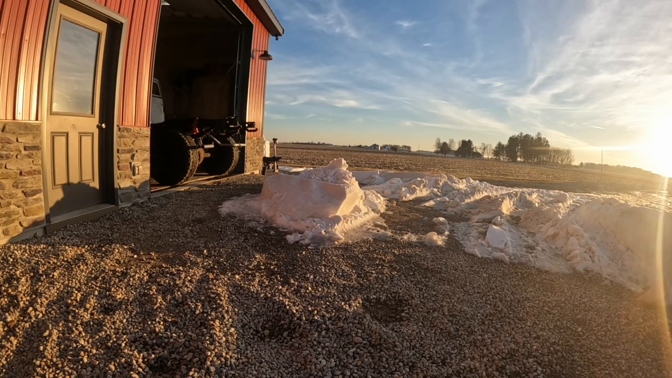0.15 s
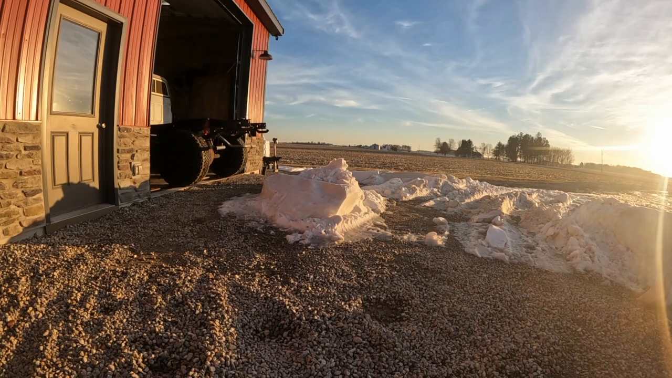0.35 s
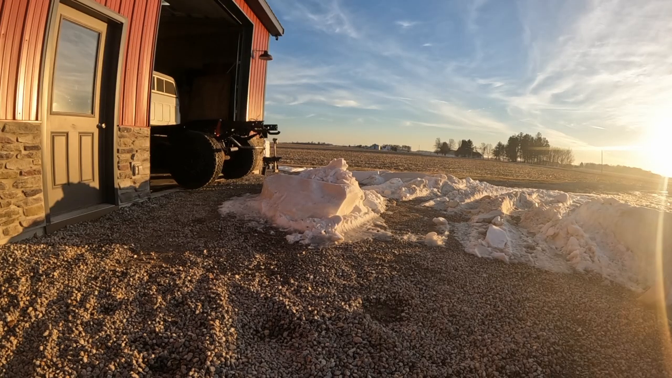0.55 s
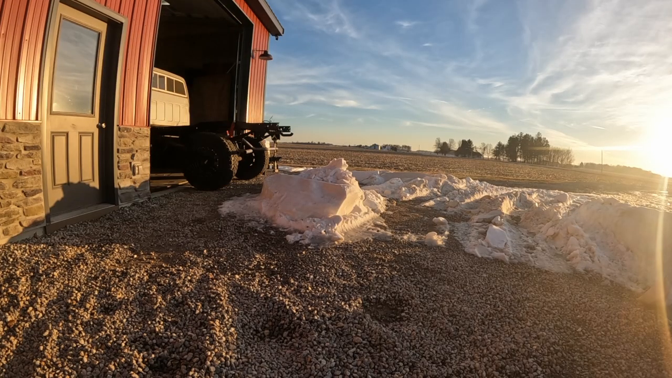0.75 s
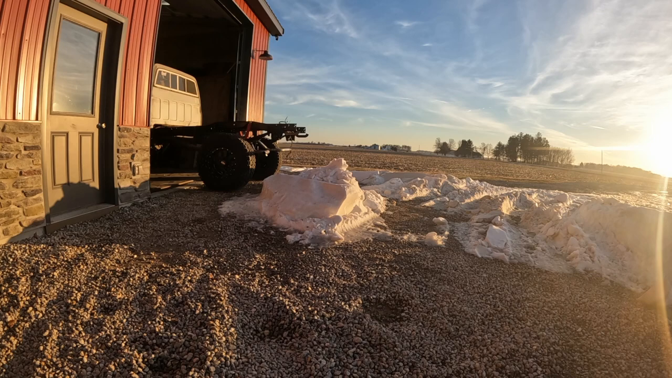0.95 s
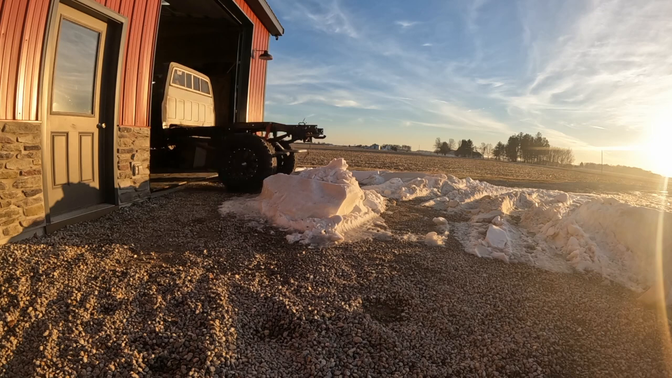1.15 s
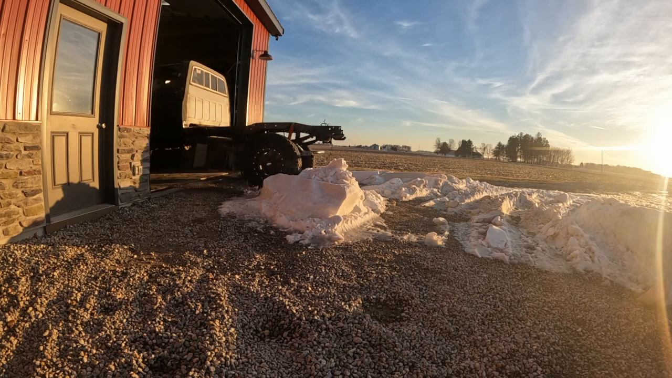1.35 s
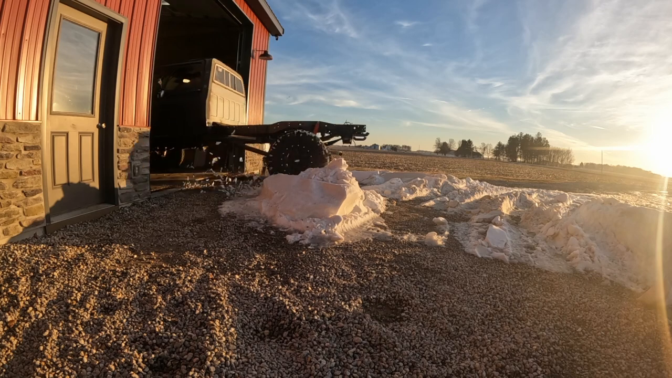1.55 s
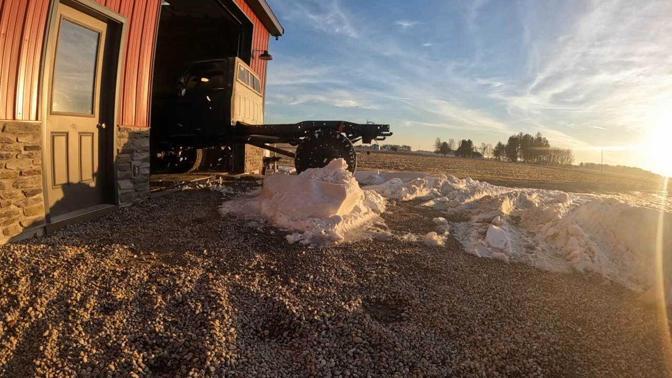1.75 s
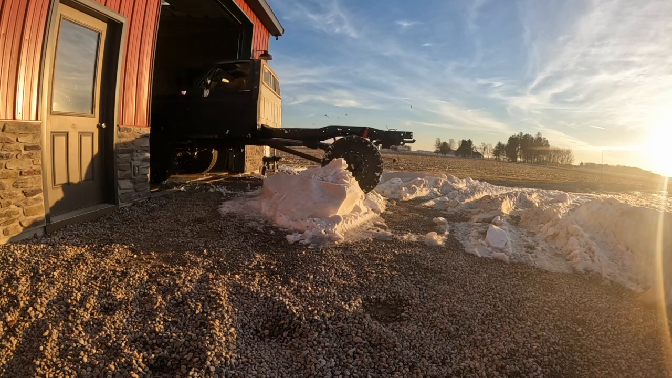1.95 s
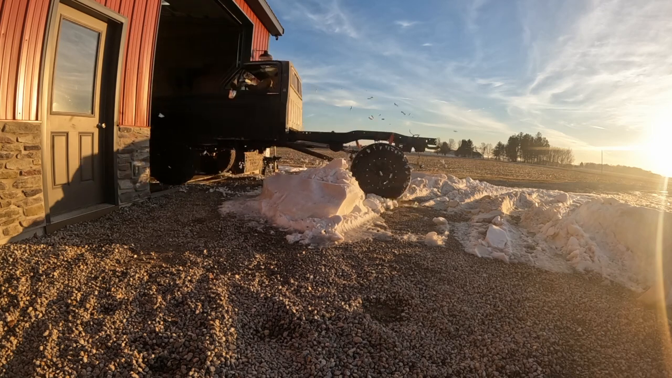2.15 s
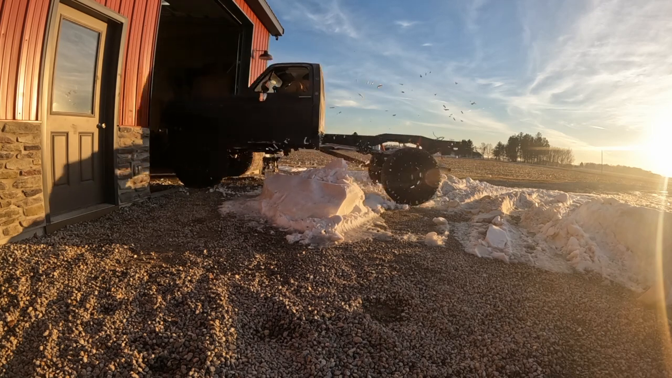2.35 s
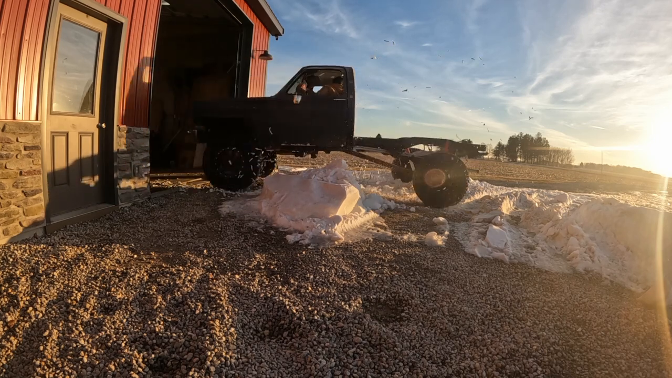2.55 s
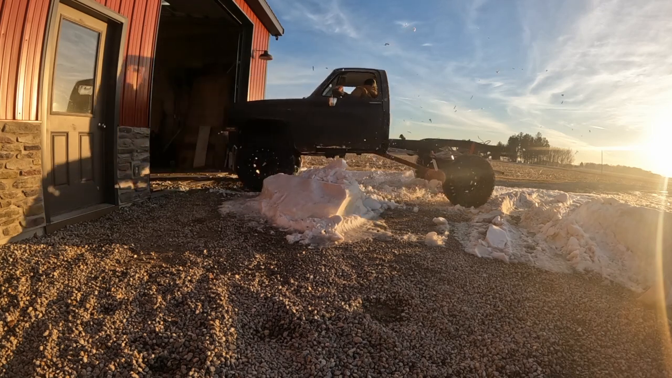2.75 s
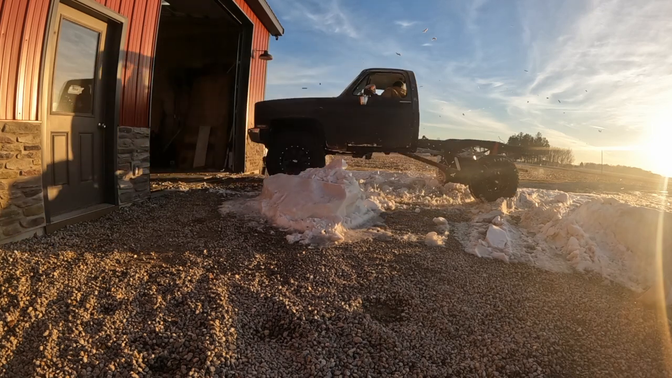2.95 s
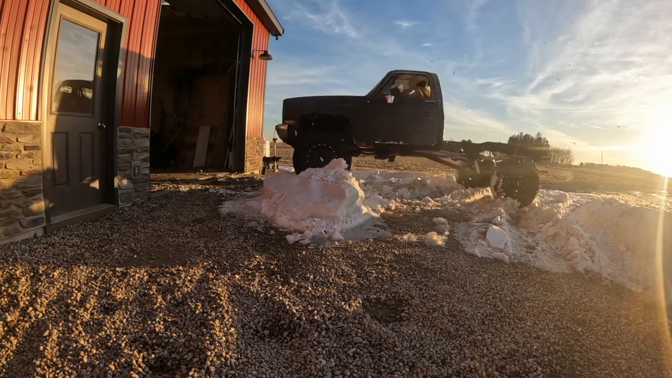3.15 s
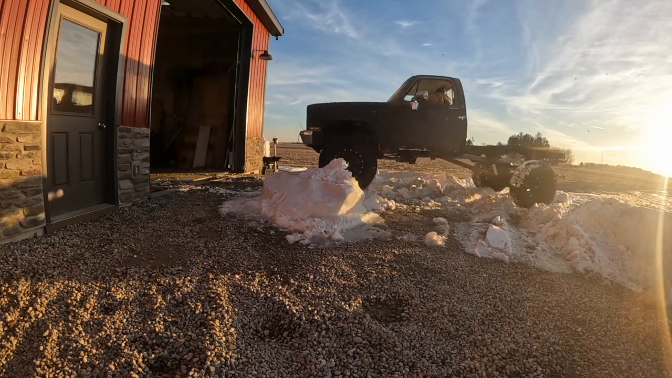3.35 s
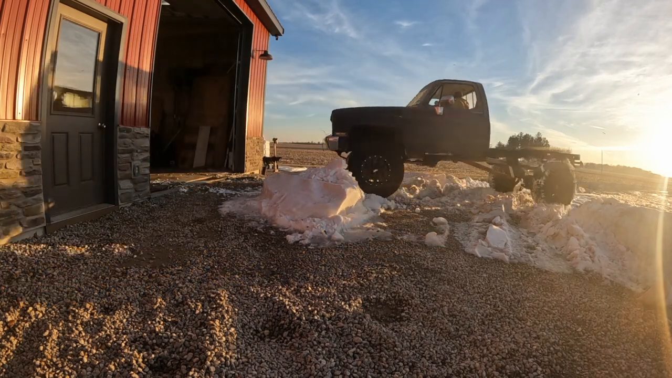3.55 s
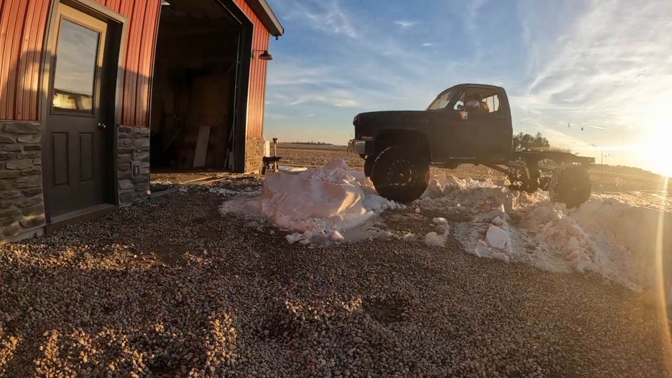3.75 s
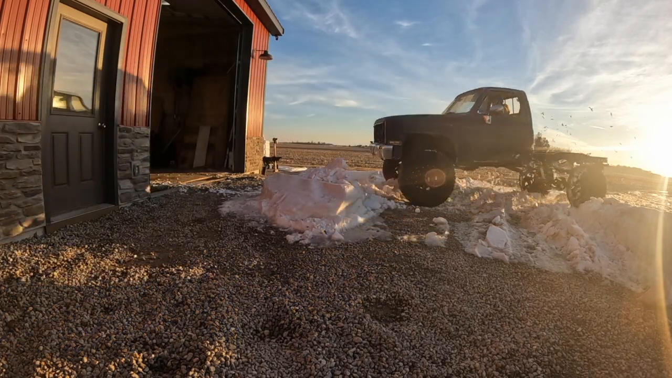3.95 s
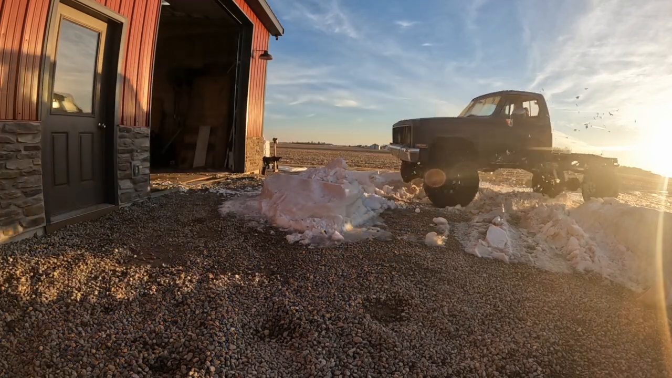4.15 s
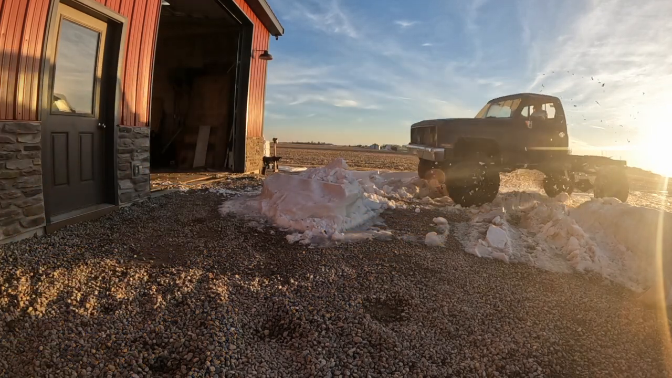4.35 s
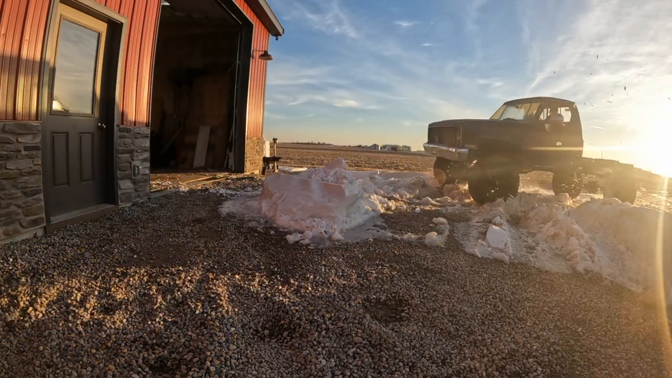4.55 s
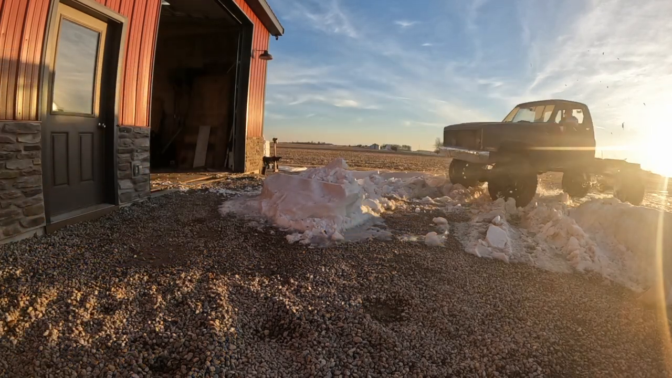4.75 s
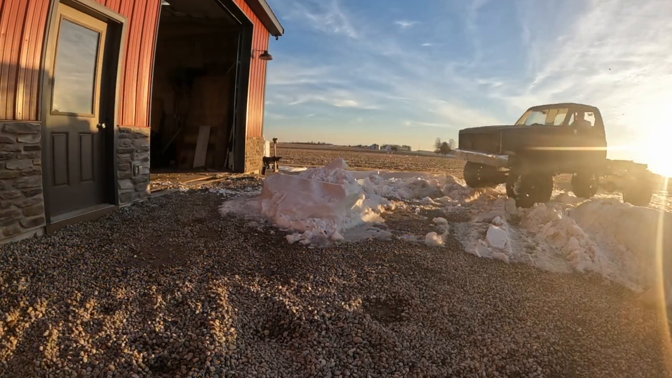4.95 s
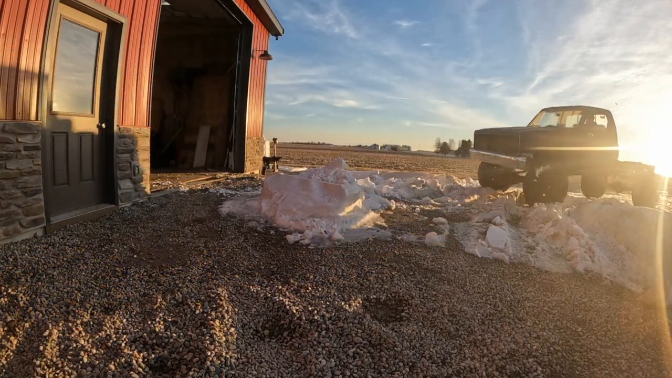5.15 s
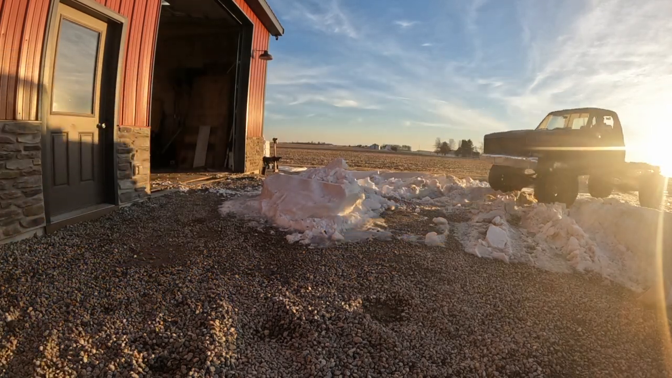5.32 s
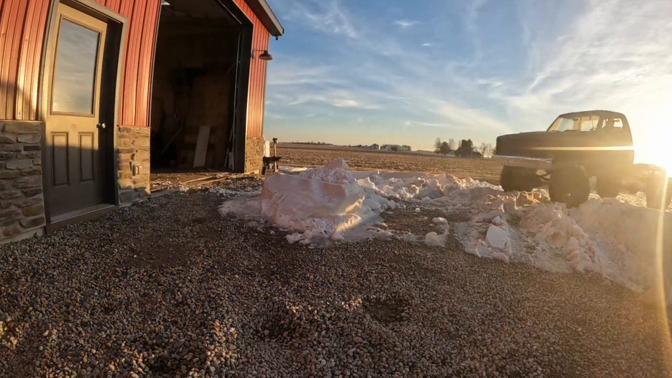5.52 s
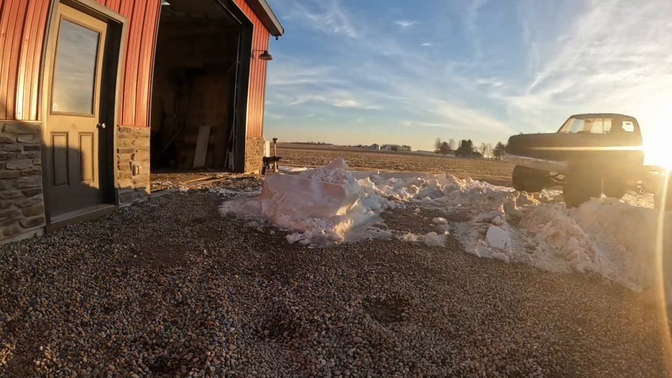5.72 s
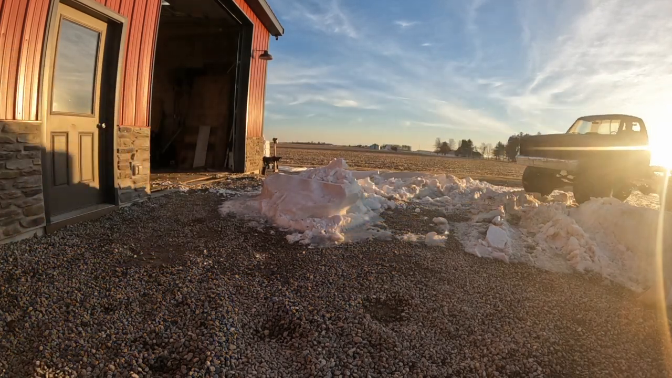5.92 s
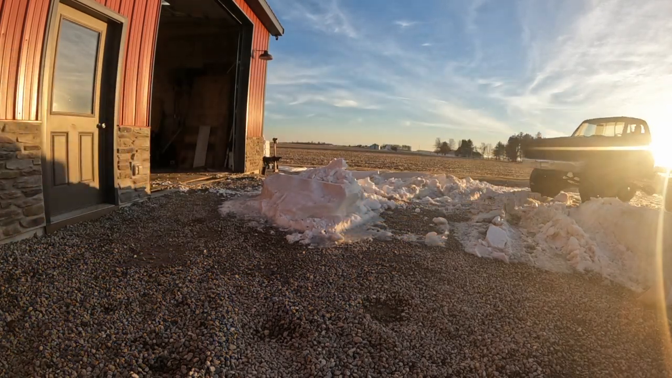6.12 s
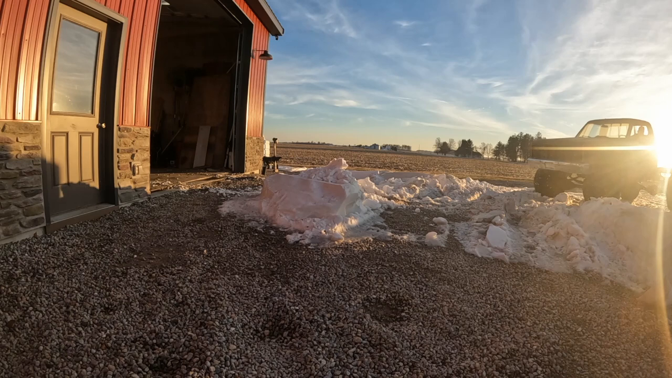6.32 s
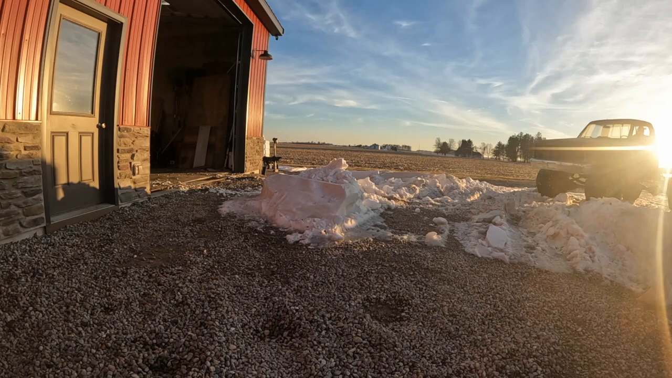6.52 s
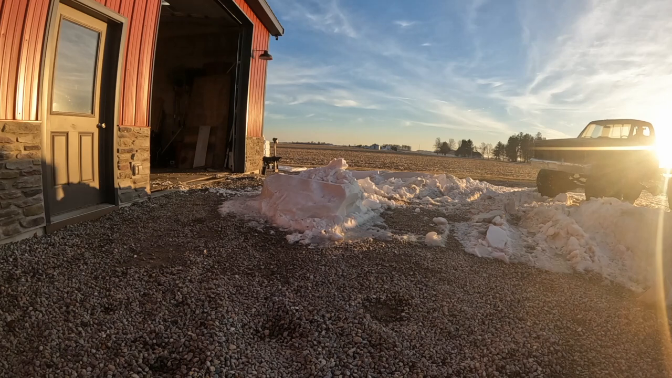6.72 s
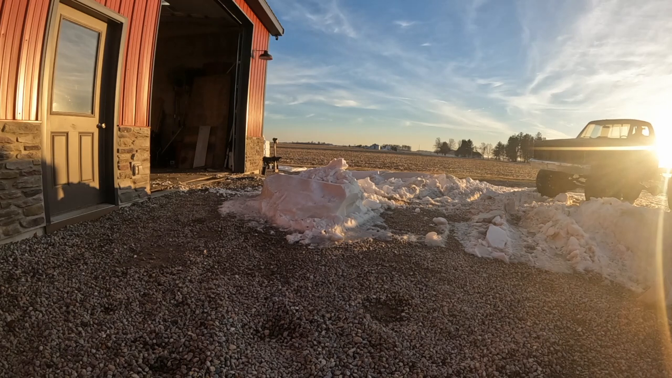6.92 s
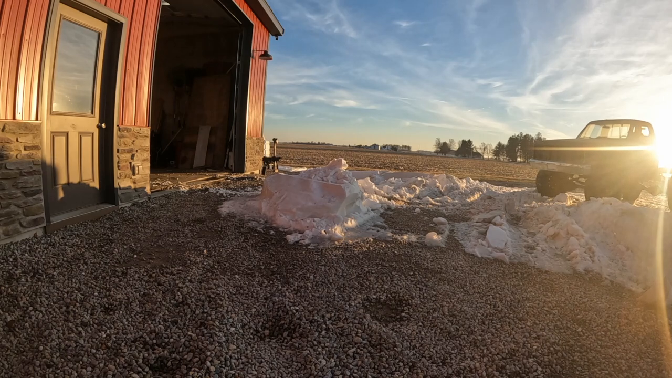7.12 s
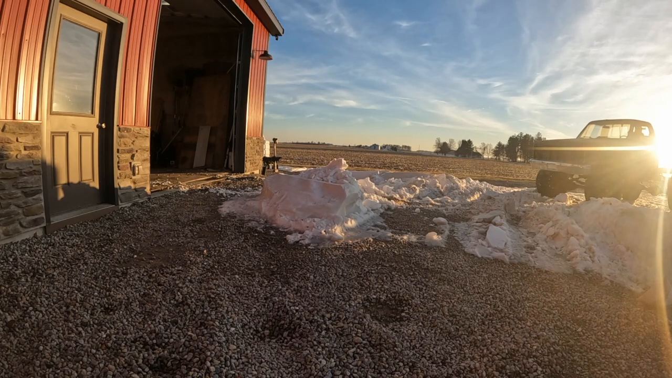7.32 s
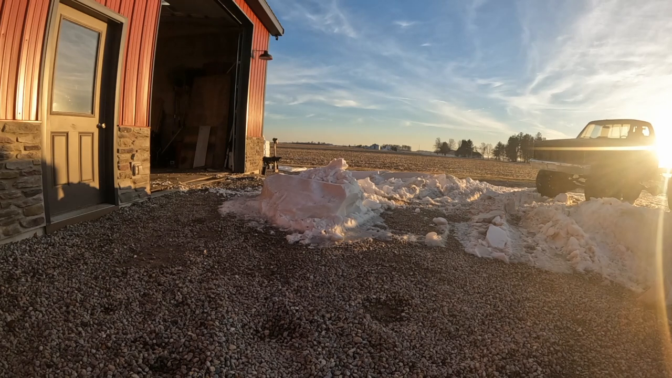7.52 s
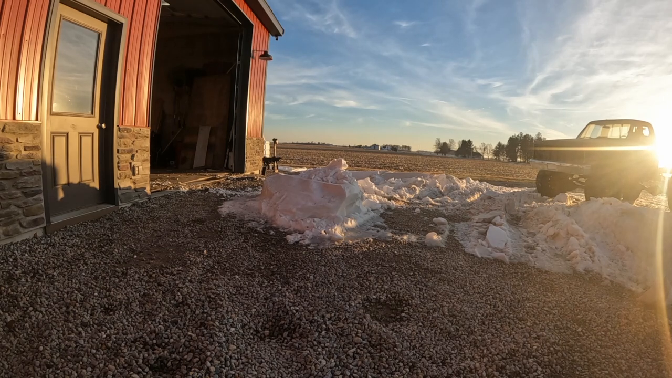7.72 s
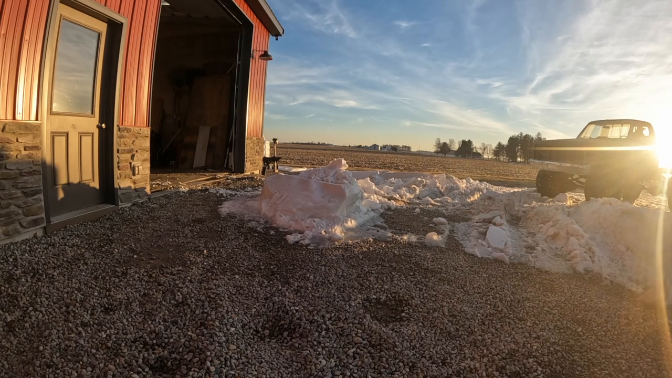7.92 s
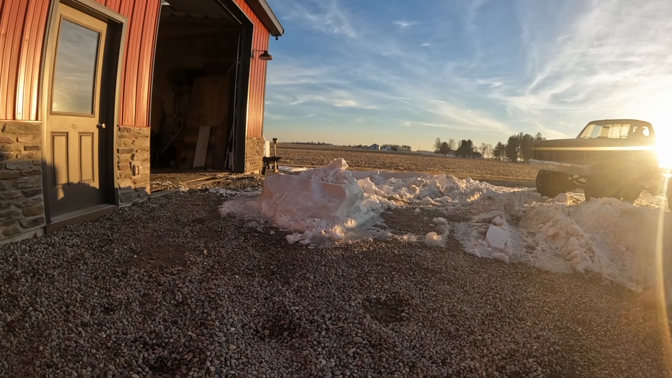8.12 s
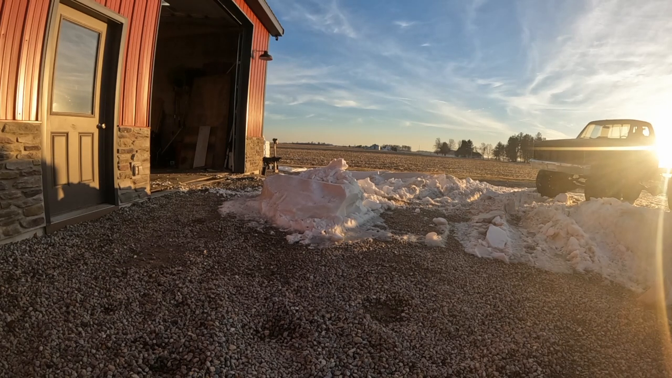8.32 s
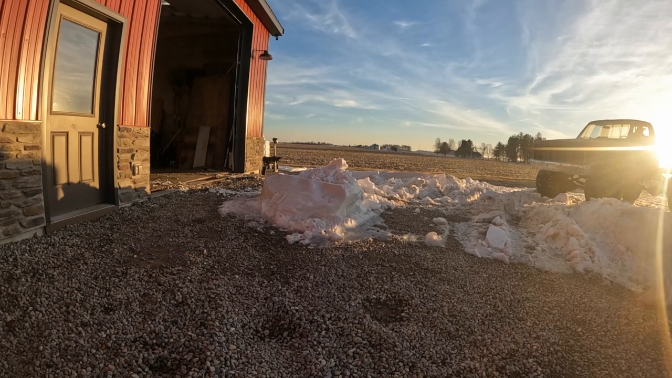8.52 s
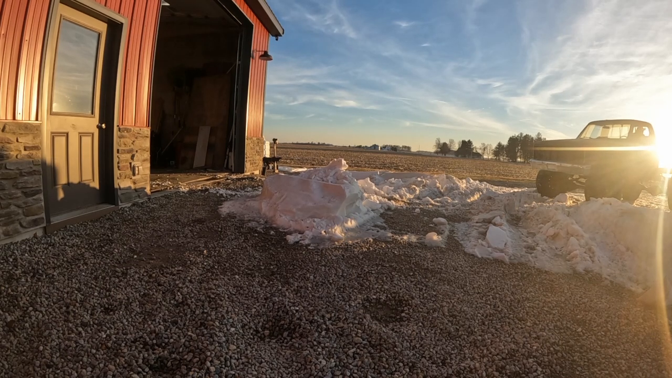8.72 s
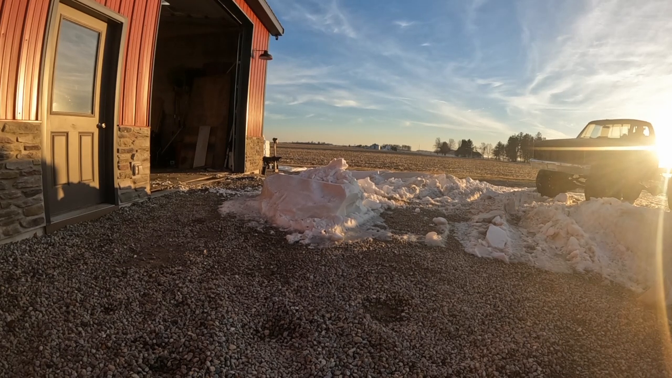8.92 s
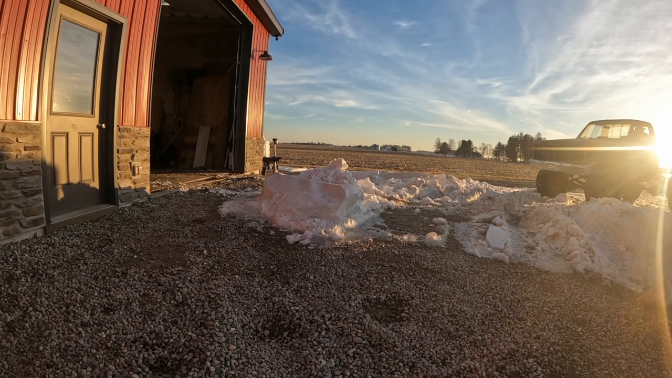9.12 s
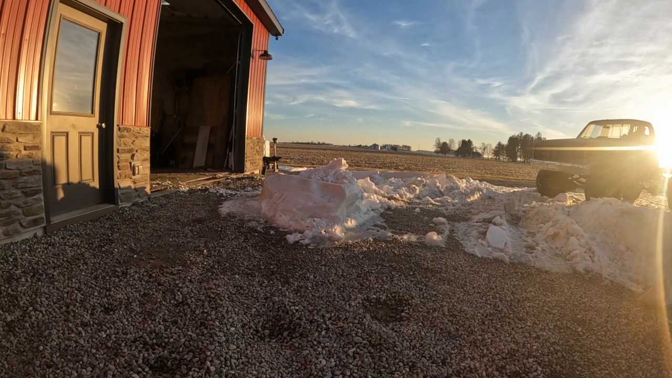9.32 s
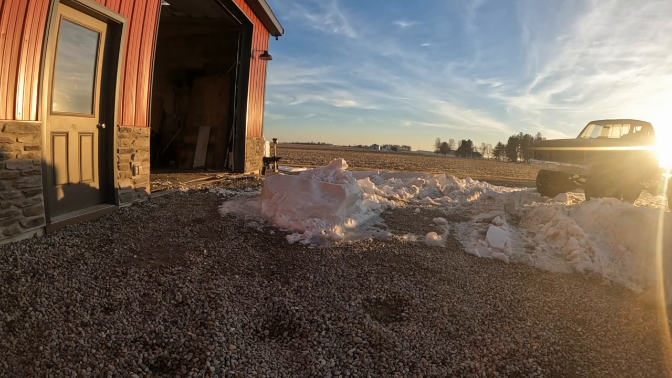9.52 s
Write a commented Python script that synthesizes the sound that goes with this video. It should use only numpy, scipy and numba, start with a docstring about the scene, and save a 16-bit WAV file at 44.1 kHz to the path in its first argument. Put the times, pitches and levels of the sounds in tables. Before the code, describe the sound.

An old V8 truck with short, unmuffled pipes backs out of a shed onto gravel. Ragged barks and deep thumps rise into several throttle surges, with sharp metallic snaps on the hardest firings and brief drops between. After about six seconds it falls to a slow, lumpy idle with soft chuffs and faint mechanical hiss. Short wall echoes follow the cracks; the stereo microphone stands on the ground outside, its loudest peaks slightly rounded.

```python
"""A cross-plane V8 truck with short open pipes backs out of a shed, blips and idles lumpily.
Two banks fire unevenly into their own pipes; every blow-down thumps the pipe and spits a crack of gas.
A few metallic snaps top the hardest firings; fan, intake and valve gear hiss on.
Place: the shed walls echo, and the slap off its front grows later as the truck draws away.
Microphone: two ports, standing on the ground; their preamp rounds the loudest peaks."""
import sys
import numpy as np
from scipy import signal
from scipy.fft import rfft, irfft, next_fast_len
from scipy.io import wavfile
from scipy.ndimage import uniform_filter1d
from numba import njit

SR = 44100
rng = np.random.default_rng(int(sys.argv[2]) if len(sys.argv) > 2 else 0)


def waveform_to_disk(signal):
    """Save audio, clipped to [-1, 1], as 16-bit WAV at the path in sys.argv[1]."""
    frames = np.transpose(np.atleast_2d(signal))
    scaled = np.clip(frames, -1, 1) * 32767
    samples = np.round(scaled).astype(np.int16)
    wavfile.write(sys.argv[1], SR, samples)


N = 426444


def undb(db):
    """Decibels to amplitude gain."""
    return 10 ** (np.asarray(db) / 20)


def unit(x):
    """Scale to rms 1."""
    return x / np.sqrt(np.mean(x ** 2))


def over_time(table):
    """Read a table at every sample: one signal for each column after the time."""
    s, *columns = np.transpose(table)
    return [np.interp(np.arange(N) / SR, s, column) for column in columns]


def on_log_hz(table, size):
    """Read a (f/Hz, value) table at every bin of a transform."""
    hz, value = np.transpose(table)
    return np.interp(np.log(np.fft.rfftfreq(size, 1 / SR) + 1), np.log(hz + 1), value)


def ring(x, modes):
    """Sum of resonances (f/Hz, width/Hz, level/dB) with alternating sign."""
    total = 0
    for k, (hz, width, db) in enumerate(modes):
        resonance = signal.lfilter(*signal.iirpeak(hz, hz / width, fs=SR), x)
        total = total + (-1) ** k * undb(db) * resonance
    return total


def butter(x, order, hz, kind="low"):
    """Butterworth filter, low-pass unless told otherwise."""
    return signal.sosfilt(signal.butter(order, hz, kind, fs=SR, output="sos"), x)


def fade(x, tau_s):
    """Every impulse becomes a sudden rise and an exponential fall."""
    return signal.lfilter([1], [1, -np.exp(-1 / (tau_s * SR))], x)


def impulses(s, size):
    """Impulses of given sizes at given times; those outside the scene are dropped."""
    at = np.round(s * SR).astype(int)
    keep = (at >= 0) & (at < N)
    return np.bincount(at[keep], size[keep], N)


def walk(rate):
    """Random levels, a new one every 1 / rate s, joined by straight slopes; spread near 1."""
    k = int(SR / rate)
    steps = np.repeat(rng.standard_normal(N // k + 1), k)
    return 1.2 * uniform_filter1d(steps, k)[:N]


# engine speed: t/s, four-stroke cycles f/Hz
SPEED = [(0, 7.382), (0.52, 9.008), (0.77, 7.378), (0.88, 11.195), (1.17, 14.199), (1.5, 14.7),
         (1.76, 10.457), (2.52, 16.272), (2.97, 11.643), (3.1, 7.017), (3.3, 10.149), (3.47, 9.393),
         (3.56, 11.84), (3.96, 14.978), (4.55, 13.422), (4.75, 10.731), (5.13, 7.672), (5.41, 9.436),
         (5.68, 10.56), (6.24, 4.747), (6.77, 5.563), (7.26, 4.849), (8.22, 6.06), (8.7, 6.2), (9.0, 6.68),
         (9.67, 6.9)]
START_CYCLE = -.435  # crank position at the first sample, in cycles
PULLING_HZ, IDLING_HZ = 10.3, 3.4  # cycles a second that bound the two states


def crank():
    """Cycles a second, cycles turned so far, and how far the engine is from idling (0) to pulling (1)."""
    cycle_hz, = over_time(SPEED)
    pulling = np.clip((cycle_hz - IDLING_HZ) / (PULLING_HZ - IDLING_HZ), 0, 1)
    return cycle_hz, START_CYCLE + np.cumsum(cycle_hz) / SR, pulling


# cylinders in firing order: bank (0 near, 1 far), thump level/dB,
# crack level/dB over the hiss table (used for the quiet cylinders only)
CYLINDERS = [(0, 0.5, 0), (1, -4, 0), (0, -3.5, -7), (0, -3, 0), (1, -11.5, -5), (0, -7, -7), (1, -3, 2.5),
             (1, -4, -12)]
FAR_BANK_LAG_S = 0.00462


def firings(jitter_s):
    """Times (cycles x cylinders): eighths of each cycle, the far bank arriving later down its longer path."""
    turns = crank()[1]
    due = np.arange(-1, np.ceil(turns[-1]))[:, None] + np.arange(8) / 8
    when = np.interp(due, turns, np.arange(N) / SR, left=-1, right=N)
    when = when + FAR_BANK_LAG_S * np.array(CYLINDERS)[:, 0]
    return when + jitter_s * rng.standard_normal(when.shape)


# pipe resonances of the near bank and the far bank: f/Hz, width/Hz, level/dB
NEAR_PIPE = [(58, 9, 0), (110, 25, -9), (150, 30, -12)]
FAR_PIPE = [(64, 16, -3), (165, 30, -13)]
# slowest surge of the gas: f/Hz, width/Hz, level/dB
SUB_PIPE = [(27.7, 12, -17)]
# upper resonances of both pipes: f/Hz, width/Hz, relative level/dB
UPPER_PIPE = [(152, 20, 1.5), (214, 35.3, 4), (271.4, 35, -3)]
# throat resonances, strongest with the throttle open: f/Hz, width/Hz, relative level/dB
THROAT = [(275.2, 43.4, 8.5), (348, 205, 1), (655, 97, -0.5)]
# how evenly the cylinders burn: t/s, share of the bass power that repeats from cycle to cycle
EVEN = [(0, .4), (.8, .5), (1.05, .92), (2.75, .92), (3.3, .6), (3.75, .92), (4.6, .9), (4.9, .7),
        (5.4, .85), (5.85, .9), (6.1, .5), (7.7, .6), (8.2, .88), (9.67, .9)]


def thump(when, bright_db, scatter_db, rumble_db):
    """Blow-down pulses ring each bank's pipe; the upper resonances wake with the throttle."""
    bank, db, _ = np.transpose(CYLINDERS)
    size = undb(db + scatter_db * rng.standard_normal(when.shape))
    near, far = (-impulses(when[:, bank == b].ravel(), size[:, bank == b].ravel()) for b in (0, 1))
    both = near + far
    churn = undb(rumble_db) * np.std(both) * rng.standard_normal((2, N))  # turbulence in the pipes

    low = ring(near + churn[0], NEAR_PIPE) + ring(far + churn[1], FAR_PIPE)
    low = butter(low, 2, [48, 180], "band") + ring(far + churn[1], SUB_PIPE)
    upper = butter(ring(both + 0.88 * churn[0], UPPER_PIPE), 3, 290)
    s, peak_db, _ = np.transpose(BARKS)
    kick = -impulses(s, undb(peak_db + 8.5))  # each listed bark kicks the throat as well
    throat = ring(both + kick + 1.15 * churn[1], THROAT)

    # each layer is brought to a steady level over a third of a second; the drive table sets its loudness
    low, upper, throat = (v / np.sqrt(uniform_filter1d(v ** 2, SR // 3) + 1e-12)
                          for v in (low, upper, throat))
    even, = over_time(EVEN)
    bass = np.sqrt(1 - even) * low + np.sqrt(even) * drone()
    upper = np.sqrt(1 - 0.36 * even) * undb(0.65 * bright_db - 5.5) * upper
    return bass + upper + undb(2.026 * bright_db - 1.0) * throat


# multiples of the engine cycle, from the second up: level/dB pulling, level/dB idling (relative)
ORDERS_DB = [(-16, -17), (-14, -4), (-12, -15), (0, -8), (-4, -20), (-12, -22), (-8, -3), (-7, 0), (-9, -9),
             (-11, 0), (-10, -6), (-8, -9), (-8, -12), (-12, -9), (-16, -1), (-18, -14), (-17, -16),
             (-17, -15), (-21, -19), (-20, -6), (-20, -7)]
# the pipe lifts or sinks whichever order crosses a low resonance: f/Hz, width/Hz, level/dB
BOOMS = [(57, 60, 8), (108.4, 19.6, 11), (159.6, 61, 8)]
# the slower the gas, the sharper the pipe's own note and the gap above it: f/Hz, width/Hz, level/dB
IDLE_BOOMS = [(57, 10, 13), (79, 14, -11)]
# the lope between the banks: t/s, fifth order level/dB, sixth order level/dB
LOPE = [(0, 1, 5), (1.2, 0, -3), (2.1, -3, -7), (2.5, -2, 3), (2.68, -12, -14), (3.3, -3, 2), (3.5, -9, 2),
        (3.68, 1, 2), (4.55, 0, 0), (4.75, -16, 5), (5.5, -18, 5), (9.67, -2, 0)]


def boost_db(hz, booms):
    """Lift in dB that a set of broad resonances gives a tone of changing frequency."""
    return sum(db / (1 + (2 * (hz - centre) / width) ** 2) for centre, width, db in booms)


def drone():
    """What repeats every cycle: a stack of crank orders whose balance shifts with engine speed."""
    cycle_hz, turns, pulling = crank()
    fifth_db, sixth_db = over_time(LOPE)
    # the strong blow-downs within a cycle set the phases
    place, strength = np.array([0, 1.6, 3, 4.6, 6.4]) / 8, np.array([1, .9, .5, .6, .5])
    out = power = 0
    for order, (pull_db, idle_db) in enumerate(ORDERS_DB, 2):
        hz = order * cycle_hz
        state_db = idle_db + pulling * (pull_db - idle_db)
        boom_db = boost_db(hz, BOOMS) + (1 - pulling ** 2) * boost_db(hz, IDLE_BOOMS)
        lope_db = fifth_db * ((order == 5) - .3 * (order == 8)) + sixth_db * (order == 6)
        size = undb(state_db + boom_db + lope_db)
        start = np.angle(np.sum(strength * np.exp(-2j * np.pi * order * place)))
        out = out + size * undb(1.6 * walk(6.)) * np.sin(2 * np.pi * order * turns + start)
        power = power + size ** 2 / 2
    return out / np.sqrt(power)


# three cylinders that bark between the listed barks while pulling and fall nearly silent at idle:
# place in the firing order, level/dB over the hiss table pulling, level/dB over the hiss table idling
BARKERS = [(0, 4, -27), (1, 4, -30), (3, 1, -29.5)]
BARKER_SCATTER_DB = 4
# barks heard one by one, from hard cracks to soft idle chuffs:
# t/s, relative peak level/dB, treble level/dB against that peak
BARKS = [(0.036, -15, -2.5), (0.081, -11.5, -8.5), (0.102, -9, -22), (0.278, -23.5, -18), (0.306, -7, -18),
         (0.343, -14, -10.5), (0.435, -20.5, -10), (0.462, -11.5, -11.5), (0.517, -14, -15.5),
         (0.533, -4.5, -21), (0.552, -8.5, -14.5), (0.653, -6.5, -12.5), (0.691, -6.5, -17),
         (0.759, -9.5, -26), (0.789, -6.5, -18), (0.826, -4, -37), (0.886, -6.5, -26), (0.917, -5.5, -16),
         (0.972, -6.5, -31), (1.002, -7.5, -15), (1.053, -5, -36), (1.068, -5.5, -15.5),
         (1.128, -9.5, -13.5), (1.2, -7, -27), (1.215, -8.5, -32), (1.272, -11.5, -13), (1.283, -6, -25),
         (1.34, -6.5, -18), (1.354, -8, -21), (1.407, -8, -14), (1.474, -11.5, -17), (1.544, -9.5, -39),
         (1.622, -12, -39), (1.65, -10.5, -20), (1.701, -20, -34), (1.735, -8.5, -28), (1.799, -9.5, -25),
         (1.83, -7, -23), (1.887, -8, -28), (1.918, -7.5, -18), (1.973, -5.5, -25), (1.99, -9, -19),
         (2.069, -10, -39), (2.13, -6, -32), (2.201, -7, -20), (2.271, -5, -29), (2.34, -6.5, -20),
         (2.407, -5.5, -30), (2.472, -6, -17.5), (2.536, -7, -15.5), (2.597, -7.5, -16), (2.66, -9, -19.5),
         (2.882, -16, -35), (3.06, -20.5, -20.5), (3.19, -20.5, -17), (3.228, -16, -31),
         (3.257, -14.5, -16.5), (3.301, -6, -19.5), (3.374, -14, -32), (3.4, -7.5, -16), (3.425, -7, -12),
         (3.521, -4.5, -17), (3.593, -4.5, -17.5), (3.621, -8.5, -17), (3.673, -7.5, -14.5),
         (3.75, -8, -13), (3.823, -13.5, -8), (3.963, -6, -16), (4.03, -7.5, -14), (4.096, -11, -11),
         (4.16, -13, -23), (4.249, -9, -20), (4.319, -8, -24), (4.395, -8, -16.5), (4.451, -14.5, -12),
         (4.524, -15.5, -9), (4.974, -22, -10), (5.163, -23.5, -4.5), (5.339, -10.5, -12.5),
         (5.441, -14, -12), (5.469, -9, -11), (5.548, -13.5, -8.5), (5.582, -9.5, -14.5), (5.68, -6.5, -19),
         (6.116, -23, -14), (6.18, -24.5, -32), (6.315, -16.5, -8.5), (6.542, -26.5, -5),
         (6.701, -15, -11.5), (6.885, -18, -16), (7.071, -19.5, -8), (7.295, -28, -9.5), (7.473, -15, -9.5),
         (7.684, -22, -10.5), (7.851, -13.5, -17), (8.03, -14.5, -13.5), (8.198, -18, -9.5),
         (8.36, -16.5, -12), (8.521, -15.5, -11), (8.686, -19.5, -5), (8.844, -20, -6), (8.993, -19.5, -5),
         (9.143, -14, -13), (9.295, -18, -7), (9.44, -17, -9), (9.586, -17, -11.5)]
BARK_VALVE_DB, BARK_TREBLE_DB = -10.5, 12.5  # valve pulse offsets in the low and the high rings
SECOND_BARK_HZ, SECOND_BARK_DB = 6.95, -7  # cycles a second below which barks pair; level of the second


def barks(when, hiss_db, push_db, scatter_db):
    """Time and strength (low, high rings) of valve openings; a listed bark silences the firings beside it."""
    t = np.arange(N) / SR
    cycle_hz, _, pulling = crank()
    bank, _, quiet_db = np.transpose(CYLINDERS)
    chance = rng.standard_normal(when.shape)
    # the cracks of both banks keep to even eighths of the cycle, without the far bank's lag
    when = when - FAR_BANK_LAG_S * bank
    over_db = quiet_db + scatter_db * chance
    pulling = np.interp(when, t, pulling)
    for k, pull_db, idle_db in BARKERS:
        over_db[:, k] = idle_db + pulling[:, k] * (pull_db - idle_db) + BARKER_SCATTER_DB * chance[:, k]
    db = (np.interp(when, t, hiss_db) + over_db).flatten()
    when = when.flatten()

    s, peak_db, treble_db = np.transpose(BARKS)
    # at idle the next cylinder barks an eighth of a cycle after each listed bark
    cycle_hz = np.interp(s, t, cycle_hz)
    idle = cycle_hz < SECOND_BARK_HZ
    s = np.append(s, (s + 1 / (8 * cycle_hz))[idle])
    peak_db = np.append(peak_db, peak_db[idle] + SECOND_BARK_DB)
    treble_db = np.append(treble_db, treble_db[idle])

    db[np.min(abs(when - s[:, None]), axis=0) < .009] = -120
    low_db = np.append(peak_db + BARK_VALVE_DB, db + np.interp(when, t, push_db))
    high_db = np.append(peak_db + treble_db + BARK_TREBLE_DB, db)
    return np.append(s, when), low_db, high_db


# rings of the pipe mouth and body panels: f/Hz, width/Hz, relative level/dB
MOUTH = [(967.5, 113, 9), (1104, 110.5, 11.5), (1407, 460, 0), (1860, 244, 0), (2942, 300, -5),
         (3386, 740, -8), (4400, 640, -9), (4990, 710, -12.5), (7100, 860, -21)]
TREBLE_LAG_S = 0.001486  # the treble rings answer later


def cracks(when, hiss_db, bright_db, scatter_db):
    """Each exhaust valve spits a shock, a short burst of gas and a longer wheeze; two hearings."""
    # the low rings of the mouth grow when the throttle pushes gas hard
    push_db = 0.89 * uniform_filter1d(bright_db, SR // 4) + 4
    when, low_db, high_db = barks(when, hiss_db, push_db, scatter_db)
    wheeze = 9 / crank()[0] ** 2  # a slow valve lets the gas out for longer
    groups = [(MOUTH[:1], low_db, 0, 16),  # rings, strength in dB, lag in s, size of the shock
              (MOUTH[1:3], low_db, 0, 16),
              (MOUTH[3:4], (low_db + high_db) / 2, 0, 5),
              (MOUTH[4:], high_db, TREBLE_LAG_S, 4.5)]
    heard = []
    for rings, db, lag_s, shock in groups:
        # separate scatter in each group gives every burst its own colour
        valves = impulses(when + lag_s, undb(db + 1.8 * rng.standard_normal(when.shape)))
        swell = fade(valves, 0.0013) / (0.0015 * SR)
        burst = 0.68 * fade(swell, 0.0052) + wheeze * fade(swell, 0.027) * undb(3.5 * walk(90.))
        gas = burst * undb(2.5 * walk(400.)) * rng.standard_normal((2, N))  # the jet sputters in grains
        gas[0] += shock * valves
        heard.append(ring(gas, rings))
    heard = heard[0] - heard[1] - heard[2] + front_echo(heard[3])
    heard = butter(heard, 3, [600, 8300], "band")
    click = np.eye(1, SR)[0]
    return heard / np.sqrt(np.sum(ring(click, MOUTH) ** 2))


# sharp metallic snaps on the hardest firings: t/s, peak level/dB before the band filter
SNAPS = [(0.0395, -22), (0.342, -23), (1.171, -23), (1.243, -27), (2.4736, -19), (2.5365, -14),
         (2.5975, -9.5), (2.6627, -20)]


def snaps():
    """Bright clicks, a millisecond or two long: a shock front and a quick fade of noise."""
    s, db = np.transpose(SNAPS)
    click = fade(impulses(s, undb(db - 13)), 0.00048) * rng.standard_normal((2, N))
    click[0] += impulses(s, undb(db))  # the shock front itself
    return butter(click, 3, [2800, 12000], "band")


# colour of the rush: f/Hz, relative level/dB per Hz
HISS = [(330, -23), (560, -13.5), (844, -7), (1070, -1.5), (1380, -15), (1980, -11), (2430, -25),
        (3090, -11), (3620, -21.5), (4600, -18), (5580, -25), (7090, -24), (8500, -42), (11000, -42.5),
        (18700, -120)]


def hiss(hiss_db):
    """Fan, intake and valve gear: coloured noise that follows the drive and flickers; two hearings."""
    size = next_fast_len(N)
    spectrum = rfft(rng.standard_normal((2, size))) * undb(on_log_hz(HISS, size))
    noise = irfft(spectrum, size)[:, :N]
    return unit(noise) * undb(hiss_db - 8.5 + 3.43 * walk(30.))


# slap off the shed front, later as the truck draws away: t/s, lag/s, level/dB
FRONT_ECHO = [(0.8, .006, -5.5), (1.2, .007, -3), (1.75, .0085, 2), (2.2, 0.01, -6), (3.7, .0135, -7),
              (4.4, 0.015, -11), (5.5, 0.017, -11)]


def front_echo(x):
    """Direct sound and its slap off the shed front, a copy read back at a changing lag."""
    t = np.arange(N) / SR
    lag_s, db = over_time(FRONT_ECHO)
    late = np.array([np.interp(t - lag_s, t, v) for v in x])
    return x + undb(db) * late


@njit
def walls(x, lags, gain, damp):
    """Eight delay lines that feed each other, duller on every round."""
    line, soft, out = np.zeros((8, 4096)), np.zeros(8), np.zeros((2, len(x)))
    for i in range(len(x)):
        total = 0.
        for k in range(8):
            soft[k] += (1 - damp) * (gain[k] * line[k, (i - lags[k]) & 4095] - soft[k])
            total += soft[k]
            out[k % 2, i] += soft[k]
        for k in range(8):
            line[k, i & 4095] = x[i] + soft[k] - total / 4
    return out


SHED_T60_S, SHED_DAMP, SHED_DB = 0.13, 0.17, -6.5  # decay before damping, treble loss 0-1, echo gain


def shed(gas):
    """The walls return the cracks as a short decay: half of the delay lines reach one port, the other half the
    other port."""
    lags = rng.integers(500, 3000, 8)  # samples
    gain = undb(-60 * lags / SR / SHED_T60_S)
    even, odd = undb(SHED_DB) * walls(gas, lags, gain, SHED_DAMP)
    # these are the shared and the differing part of the sound at the ports
    return np.array([even + odd, even - odd])


# colour between the ports: f/Hz, left minus right level/dB
PORT_DB = [(200, -4.5), (530, 10), (910, 3.5), (1570, 3), (2710, 11), (4670, -0.5), (8050, -2),
           (12000, 6.5)]
# phase between the ports: f/Hz, lead of the left/radians
PORT_LEAD = [(200, 0), (1640, .5), (2150, -.3), (2580, -1.6), (3530, .2), (4390, 0), (5430, .7), (6370, .1),
             (8180, -.1)]
# unlikeness of the ports: f/Hz, share heard differently
PORT_UNLIKE = [(250, .03), (1000, 0.12), (2000, 0.31), (8000, 0.33), (12000, 0.47)]


def ports(heard):
    """Two microphone ports: a shared sound with its own colour and phase in each, plus a part that differs."""
    size = next_fast_len(N)
    common, other = rfft(heard, size)
    tilt = undb(on_log_hz(PORT_DB, size) / 2) * np.exp(.5j * on_log_hz(PORT_LEAD, size))
    other = other * np.clip(on_log_hz(PORT_UNLIKE, size), 0, .9)
    left, right = (common + other) * tilt, (common - other) / tilt
    return irfft(np.array([left, right]), size)[:, :N]


# how the truck is driven: t/s, thump level/dB, throttle brightness level/dB, hiss level/dB (all relative)
DRIVE = [(0.0, -13.5, -11.5, -20), (0.1, -12.5, -8, -26.5), (0.27, -31, -10.5, -42.5),
         (0.33, -18.5, -11.5, -24.5), (0.44, -21.5, -7, -33.5), (0.561, -15, -6.5, -27.5),
         (1.21, -15, -3.5, -22), (1.86, -17, -4.5, -30.5), (2.48, -15, -3.5, -24.5),
         (2.7, -16, -7.5, -36.5), (2.9, -25, -4.5, -36.5), (3.049, -21.5, -9, -44.5),
         (3.17, -21.5, -12.5, -41.5), (3.22, -23, -6, -28.5), (3.35, -13, -9.5, -28.5),
         (3.85, -14.5, -6, -23), (4.1, -16, -5, -25.5), (4.55, -15.5, -5.5, -26), (4.74, -21.5, -8.5, -38),
         (4.95, -23.5, -11, -37.5), (5.14, -17, -22, -34.5), (5.25, -25.5, -13, -35),
         (5.36, -16, -12.5, -26), (5.57, -13, -8, -24.5), (5.87, -19, -11, -34.5), (6.0, -27, -11.5, -36.5),
         (6.3, -20, -13.5, -32), (7.33, -18, -15.5, -31), (9.67, -15.5, -15, -32)]


def scene():
    """Engine, shed echo and microphone ports; the long bass waves reach both ports alike."""
    thump_db, bright_db, hiss_db = over_time(DRIVE)
    when = firings(jitter_s=.0005)
    gas = cracks(when, hiss_db, bright_db, scatter_db=2.2)
    heard = gas + snaps() + hiss(hiss_db) + shed(gas[0])
    bass = undb(thump_db) * thump(when, bright_db, scatter_db=1.5, rumble_db=-5)
    return ports(heard) + bass


def record(dry):
    """The microphone housing dents the low treble; the preamp rounds the loudest peaks and cuts the top."""
    dented = signal.lfilter(*signal.iirnotch(2450, 6., fs=SR), dry)
    dry = 0.52 * dry + 0.42 * dented
    loud = np.tanh(.9 * dry) / .9
    return signal.sosfilt(signal.ellip(8, .2, 80, 14600, fs=SR, output="sos"), loud)


dry = scene()
out = record(dry)
waveform_to_disk(out)
```